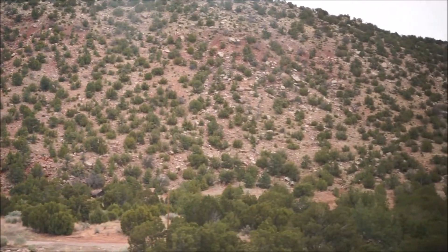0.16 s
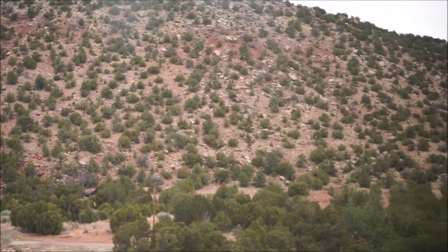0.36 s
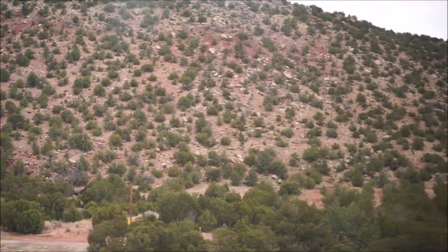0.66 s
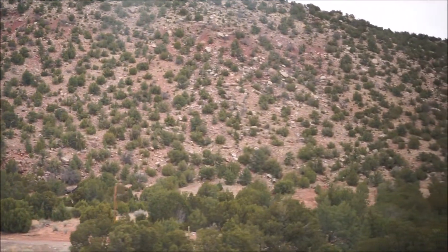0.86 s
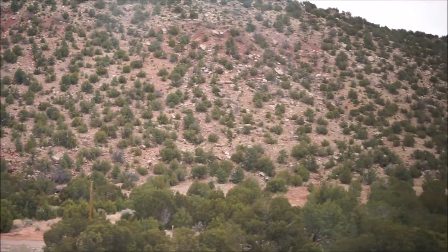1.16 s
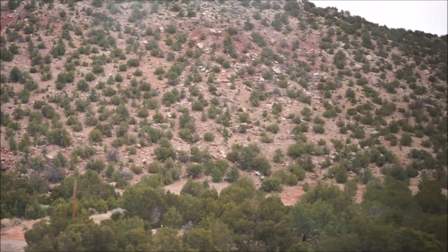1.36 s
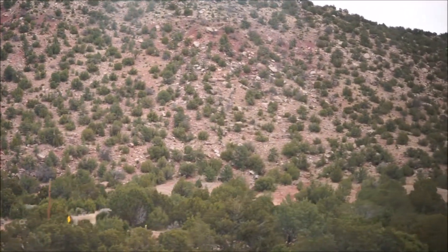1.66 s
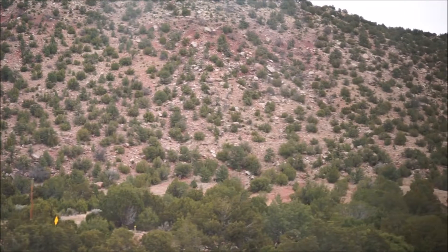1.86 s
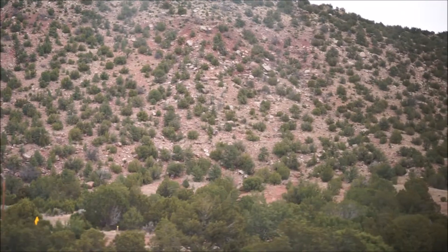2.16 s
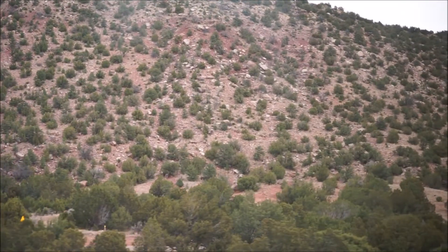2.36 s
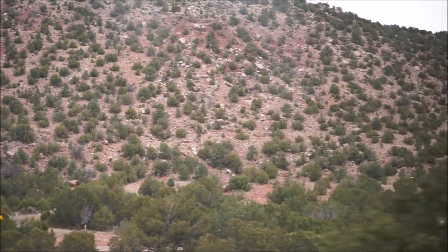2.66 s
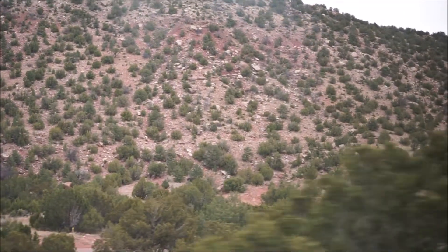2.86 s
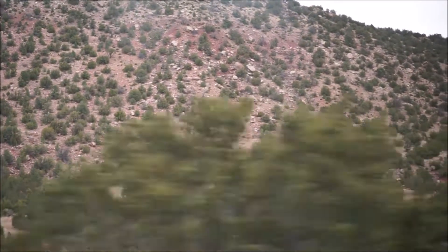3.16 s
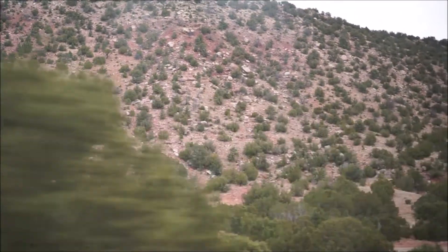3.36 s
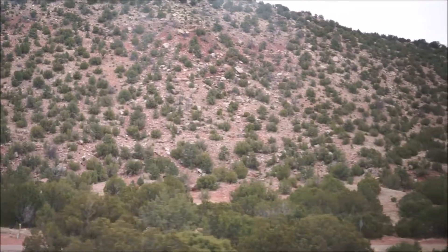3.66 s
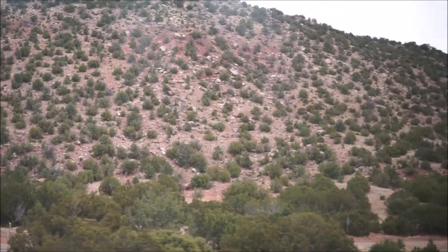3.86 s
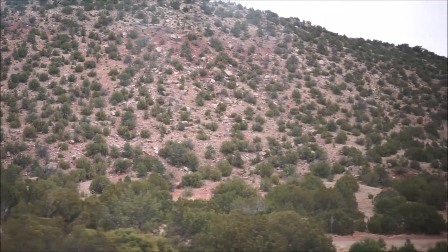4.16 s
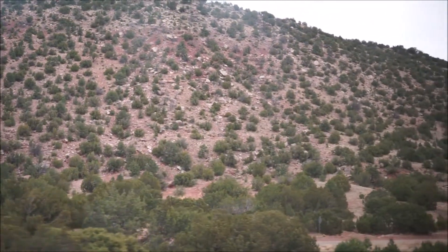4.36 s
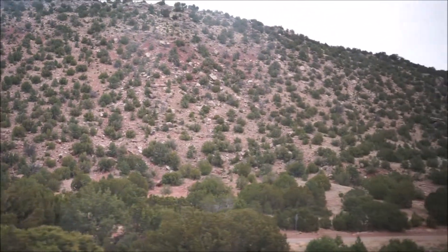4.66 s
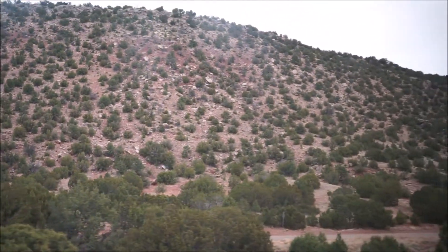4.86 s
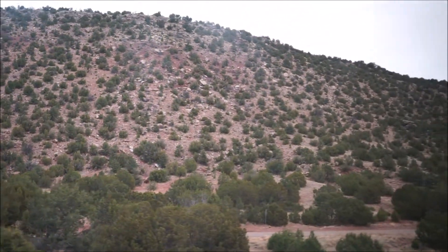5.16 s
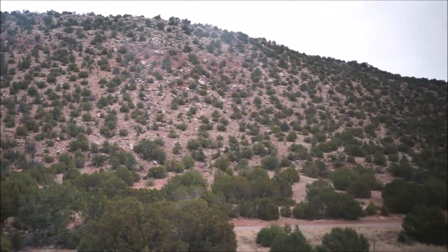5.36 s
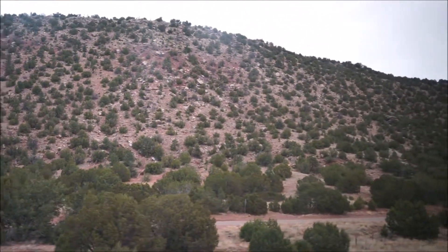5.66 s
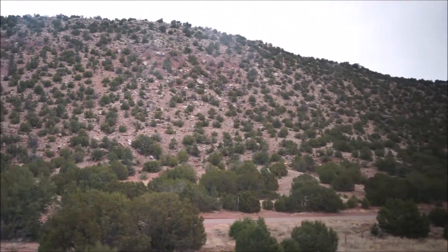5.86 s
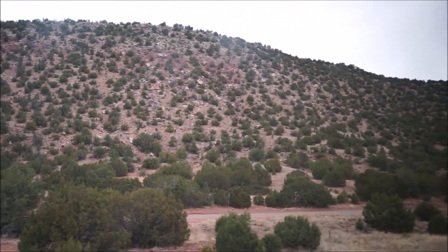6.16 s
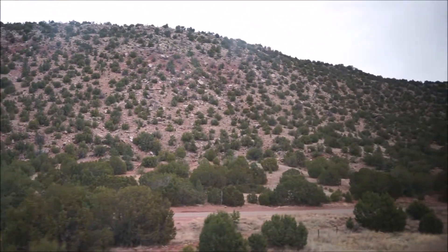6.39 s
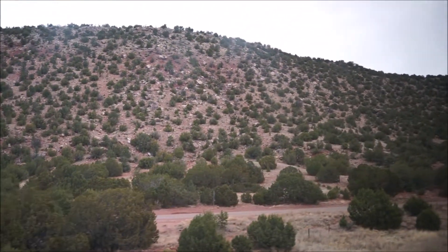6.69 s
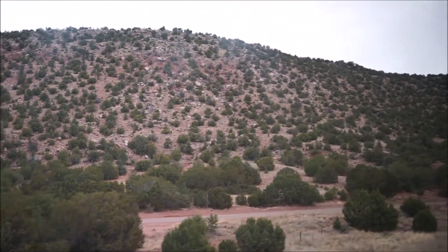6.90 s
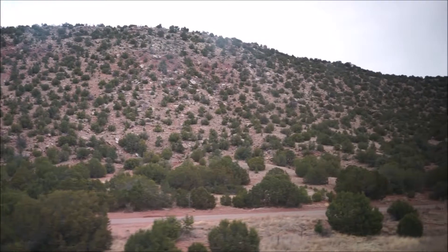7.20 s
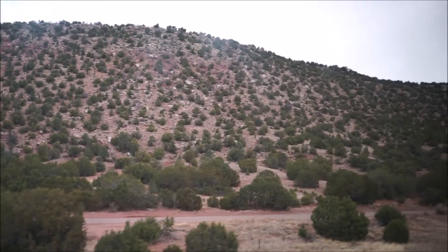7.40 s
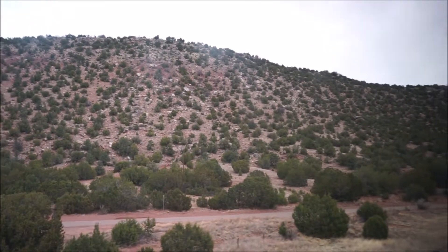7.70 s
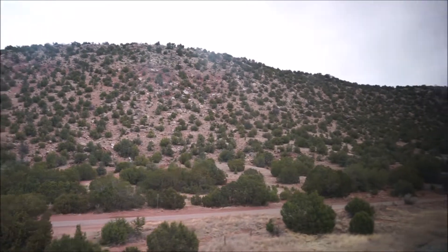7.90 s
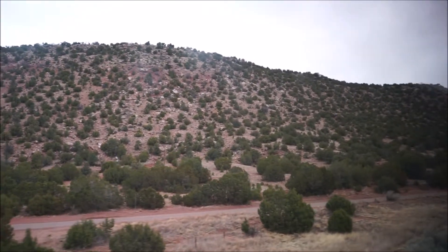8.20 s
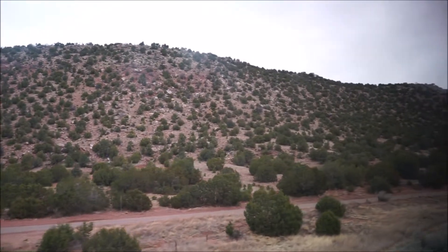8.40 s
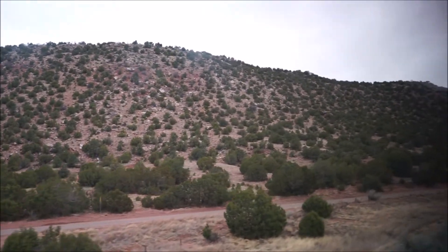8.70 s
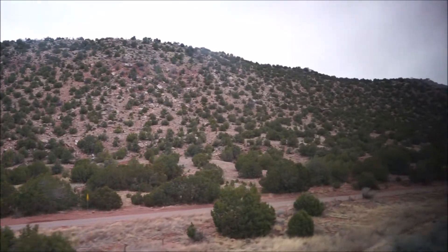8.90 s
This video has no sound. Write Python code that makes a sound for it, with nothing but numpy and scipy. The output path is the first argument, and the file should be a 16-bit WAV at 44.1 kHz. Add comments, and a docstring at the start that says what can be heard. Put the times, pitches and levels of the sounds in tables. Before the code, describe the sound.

A cabin microphone picks up a train rolling past dry hills: broad floor rumble, throbbing body hums and a quiet, steady airy hiss. The loudness keeps creeping upward and stepping quickly down. A small hard tick comes shortly before two close, woody thumps of wheels crossing a joint, with a strong deep bass surge. Afterwards the rumble and hums continue, with one barely noticeable tick late on.

```python
"""Inside a rolling passenger carriage: wheels on rails shake the floor into a broad rumble, shaped noise, while
wavering hums, decaying body modes, come and go and ventilation hisses through the cabin's resonances.
From the first moments rumble, hums and air creep up in level and now and then step quickly down.
Near 2.8 s a fitting ticks, a snap ringing small modes; from 3.3 s a double bump, blows ringing the floor,
passes under the car; near 7.9 s the fitting ticks again, fainter."""
import sys
import numpy as np
from scipy import signal
from scipy.fft import rfft, irfft, next_fast_len
from scipy.io import wavfile
from scipy.ndimage import uniform_filter1d

SR = 44100
rng = np.random.default_rng(int(sys.argv[2]) if len(sys.argv) > 2 else 0)


def file_out(sig):
    """Save sig as 16-bit WAV at sys.argv[1]."""
    # one column per channel
    cols = np.atleast_2d(sig).T
    # limit, then scale
    lim = np.clip(cols, -1, 1)
    pcm = np.round(lim * 32767).astype(np.int16)
    wavfile.write(sys.argv[1], SR, pcm)


N = 398663

# Spectrum of the rolling noise through the floor: frequency_hz, density_db (relative, per Hz)
ROLLING_SPECTRUM = [(14, -8.5), (25, -1), (60, 0), (95, -5), (130, -8), (155, -16), (215, -9), (260, -17.5),
                    (350, -19), (470, -31), (800, -32.5), (900, -39.5), (1600, -45.5), (2500, -59)]
# Spells in which one car-body mode hums; the rails keep most of them going, while the short 166-167 Hz spells
# at 3.33 s and 3.52 s are set ringing by the wheel bumps: # start_s, length_s, pitch_hz, amplitude_db (before
# creep and steps)
HUM_SPELLS = [(.12, .25, 24.7, -11), (.48, .1, 25, -14), (.85, .5, 25, -18), (1.52, .2, 25, -10),
              (1.95, .7, 25.3, -13), (2.7, .55, 31, -15), (3.33, .32, 27.6, -1), (3.7, .25, 27.6, -5),
              (4.62, .75, 28.9, -13), (5.55, .6, 29, -17), (6.5, 1.3, 27.8, -15), (8.05, .3, 30, -13),
              (8.7, .34, 30, -17), (.05, 1.3, 41, -14), (1.55, .75, 56, -13), (2.5, .5, 43, -12.5),
              (3.2, .35, 36.8, -10), (3.65, .5, 36.8, -12), (4.65, 1.0, 41, -19), (5.7, .5, 46, -18),
              (6.4, 1.55, 41.5, -11.5), (8.2, .35, 48, -9), (8.72, .32, 50, -10), (.12, 1.25, 81.5, -15),
              (1.4, .08, 82, -6), (1.4, .5, 73, -15), (1.95, .12, 78, -13), (2.27, .12, 80, -7),
              (2.3, 1.0, 74.8, -10.5), (3.33, .26, 83.5, -8), (3.65, .6, 74.8, -16), (4.3, .85, 75, -21),
              (5.38, .55, 81, -19), (6.1, .08, 84, -14), (6.39, .16, 80, -11), (6.85, .42, 82.3, -12),
              (7.3, .22, 84, -16), (7.55, .55, 82.6, -8), (7.6, .75, 74, -11), (8.35, .69, 83, -13),
              (6.7, .6, 119, -23), (.05, .15, 175.5, -18), (.25, .7, 175.5, -22.5), (.95, 1.5, 169.5, -21),
              (2.5, .6, 169, -26), (3.33, .05, 166, -14), (3.52, .05, 167, -13), (3.65, 2.4, 170, -30),
              (6.55, .9, 167, -28), (7.45, .6, 165, -23), (8.22, .35, 166, -21), (8.8, .24, 166, -20),
              (2.6, 1.4, 205, -24), (0, 1.2, 352, -32)]
# Bumps under the wheels: start_s, level_db (relative), push_ms, rise_ms
WHEEL_BUMPS = [(3.326, -7, 0.66, 16), (3.345, -13, 1.6, 6.5), (3.362, -13, 0.93, 4.8),
               (3.508, -16, 1.3, 11), (3.522, -8, 5.3, 8), (3.545, -9, 5.3, 8)]
# Modes of the floor after a bump: frequency_hz, strength_db, t60_s
FLOOR_MODES = [(118.9, -5, .15), (145, 4, 0.18), (225.9, 2, 0.11), (311, -10.5, .25), (374, -5, 0.066),
               (418, 3.5, 0.042), (486, -1, 0.058), (578, 3, 0.064), (680, -8, 0.062), (820, -6.5, 0.083),
               (930, -10, .05), (1100, -9, 0.08), (1502, -8, 0.054)]
# Ticks of a loose fitting: start_s, level_db (relative), push_ms
FITTING_TICKS = [(2.8075, -21.5, .05), (7.856, -26.5, .08)]
# Modes of the fitting: frequency_hz, strength_db, t60_s
FITTING_MODES = [(1995, 3, 0.0086), (2605.4, -8, 0.0035), (3130, -3, 0.0074), (3798, -3, .003),
                 (4600, -2, 0.0032), (5270, -11, .003), (5900, -2.5, 0.0037), (7100, -13, .002),
                 (7940, -2, .002), (10500, -6, .0015), (13500, -9, .0015)]
# Spectrum of the ventilation air: frequency_hz, density_db (relative, per Hz)
AIR_SPECTRUM = [(600, -6), (1300, -1.5), (1650, -4.5), (2100, -0.5), (3000, -0.5), (3500, -7), (4500, -11),
                (8000, -13), (15500, -15.5)]
# Cabin and duct resonances fed by the air: frequency_hz, width_hz, level_db (above the steady reference)
CABIN_RESONANCES = [(216, 32.6, 15), (354.3, 33, 4.5), (401.3, 15, 1.5), (511.4, 25.7, 7.5),
                    (606.6, 66, 2.5), (657, 33, -1.5), (789, 22, -5), (982.7, 28, -1.5), (1165, 106, -2),
                    (1265, 32, -8.5), (1398, 45, -9), (1634, 25, -14.5), (1835, 60, -10), (2050, 69, -6.5),
                    (2300, 33, -7), (2708, 53, -10), (2896, 140, -5.5), (3098, 48, -9.5), (3940, 180, -13)]
# Quick steps down in level: start_s, drop_db
LEVEL_STEPS = [(.314, 3.6), (.55, .8), (1.1, .6), (1.45, .8), (1.74, 1.3), (2.01, 1.4), (2.3, 1.1),
               (2.428, 3.5), (2.55, .7), (2.72, 1.5), (3.385, 2.8), (3.435, .6), (3.515, 1.5), (3.62, .7),
               (6.14, 4.9), (7.19, 3.1), (7.29, .5), (7.6, .9), (7.805, 2.5), (7.97, 2.6), (8.525, 1.8)]

STEADY_DB = -46.6  # reference of the steady noise at the start: the level of the top hiss
ROLLING_DB, AIR_DB = 32.6, 7.5  # rms above that reference
CREEP_DB_PER_S, STEP_S = 3.8, 0.012  # upward creep; duration of one step down
SWELL_CYCLES, DIE_CYCLES = 3.5, 4.5  # periods a hum takes to build up and to die away
WAVER_SHARE, WANDER_PER_S = 0.012, 17  # pitch spread as a share of the pitch; new random values per second
THROB_DB, THROB_AT_HZ = 4, 120  # strength spread of a mode at this pitch; lower, heavier modes throb less
BUMP_RATTLE_MS, TICK_RATTLE_MS = 14.0, 6.4
TOP_HZ = 15770


def undb(db):
    """Logarithmic level: decibels to amplitude gain."""
    return 10 ** (np.asarray(db) / 20)


def level(x, db):
    """Mean-square normalisation: scale a signal to an rms level."""
    return x * undb(db) / np.sqrt(np.mean(x ** 2))


def walk(rate):
    """Slow random modulation: values held 1 / rate s, smoothed twice; spread near 1."""
    hold = int(SR / rate)
    held = np.repeat(rng.standard_normal(N // hold + 1), hold)
    smooth = uniform_filter1d(uniform_filter1d(held, hold), hold)
    return 1.3 * smooth[:N]


def noise(gain):
    """Linear filtering: white noise weighted by a function of frequency."""
    size = next_fast_len(N)
    hz = np.arange(1, size // 2 + 2) * SR / size
    return irfft(rfft(rng.standard_normal(size)) * gain(hz), size)[:N]


def bands(spectrum, flicker_db, rate):
    """Band decomposition: overlapping octave bands under a spectrum, each flickering on its own."""
    hz, db = np.transpose(spectrum)
    out = 0
    for centre in 2.0 ** np.arange(4, 15):
        def gain(f):
            inside = np.cos(np.pi / 2 * np.clip(np.log2(f / centre), -1, 1))
            return inside * undb(np.interp(np.log(f), np.log(hz), db, left=-90))
        if hz[0] / 2 < centre < 2 * hz[-1]:
            out = out + undb(flicker_db * walk(rate)) * noise(gain)
    return out


def ring(modes, length):
    """Modal superposition: exponentially decaying sines after a unit blow, strengths varied at random."""
    t = np.arange(int(length * SR)) / SR
    luck = undb(2 * rng.standard_normal(len(modes)))
    out = np.zeros(len(t))
    for gain, (hz, db, t60) in zip(luck, modes):
        decay = 1000.0 ** (-t / t60)
        out += gain * undb(db) * np.sin(2 * np.pi * hz * t) * decay
    return out


def blow(push_ms, rattle_ms, loose):
    """Contact excitation: a firm contact, then a fading rattle; a longer push sounds duller."""
    push = np.hanning(int(push_ms * SR / 1000) + 3)
    fade = np.linspace(1, 0, int(rattle_ms * SR / 1000))
    rattle = fade * rng.standard_normal(len(fade))
    force = loose * rattle / np.sqrt(np.sum(rattle ** 2))
    force[0] += 1 - loose  # the firm contact
    return np.convolve(force, push / push.sum())


def add(out, start_s, sound):
    """Superposition: mix a sound in at its start time."""
    i = int(start_s * SR)
    out[i:i + len(sound)] += sound[:len(out) - i]


def rolling():
    """Random excitation: wheels on rails shake the floor into a broad, flickering rumble."""
    return level(bands(ROLLING_SPECTRUM, 1.4, 6), ROLLING_DB)


def hum(length, hz, waver, throb):
    """Sustained resonance: a body mode, kept ringing by the rails or set off by a bump, swells, wavers, throbs
    and dies away."""
    t = np.arange(len(waver)) / SR
    swell = np.minimum(t * hz / SWELL_CYCLES, 1)
    dying = np.clip(1 - (t - length) * hz / DIE_CYCLES, 0, 1)
    cycles = np.cumsum(hz * (1 + WAVER_SHARE * waver)) / SR + rng.random()
    strength = level(undb(THROB_DB * np.sqrt(hz / THROB_AT_HZ) * throb), 0)
    return swell * dying * strength * np.sin(2 * np.pi * cycles)


def hums():
    """Modal superposition: every spell of humming, wandering along its own stretch of random modulation."""
    out = np.zeros(N)
    wander = np.array([walk(WANDER_PER_S), walk(WANDER_PER_S)])
    for start_s, length, hz, db in HUM_SPELLS:
        size = int((length + DIE_CYCLES / hz) * SR)
        at = int(rng.random() * (N - size))
        waver, throb = wander[:, at:at + size]
        add(out, max(start_s, 0), undb(db) * hum(length, hz, waver, throb))
    return out


def bumps():
    """Impact response: wheel blows ring the floor, building up on the way through springs and frame."""
    out = np.zeros(N)
    for start_s, db, push_ms, rise_ms in WHEEL_BUMPS:
        sound = signal.fftconvolve(ring(FLOOR_MODES, 0.5), blow(push_ms, BUMP_RATTLE_MS, 0.3))
        rise = np.minimum(np.arange(len(sound)) / (rise_ms * SR / 1000), 1)
        add(out, start_s, undb(db) * sound * rise)
    return out


def ticks():
    """Impact response and radiation: short hard snaps of a part too small to radiate bass."""
    out = np.zeros(N)
    for start_s, db, push_ms in FITTING_TICKS:
        sound = signal.fftconvolve(ring(FITTING_MODES, 0.05), blow(push_ms, TICK_RATTLE_MS, 0.76))
        add(out, start_s, undb(db) * sound)
    return signal.sosfilt(signal.butter(4, 1750, "high", fs=SR, output="sos"), out)


def ventilation():
    """Resonant filtering: air hiss plus the cabin and duct resonances that it feeds."""
    out = level(bands(AIR_SPECTRUM, 0.17, 14), AIR_DB)
    for hz, width, db in CABIN_RESONANCES:
        peak = noise(lambda f: 1 / (1 + (2 * (f - hz) / width) ** 2))
        out = out + undb(1.92 * walk(4)) * level(peak, db)
    # rail roughness makes hiss and resonances flutter together a little
    return out * undb(0.24 * walk(45))


def drift_db():
    """Level modulation: a steady creep upwards, cut by quick steps down."""
    t = np.arange(N) / SR
    drift = CREEP_DB_PER_S * t
    for start_s, drop_db in LEVEL_STEPS:
        drift -= drop_db * np.clip((t - start_s) / STEP_S, 0, 1)
    return drift


def scene():
    """Superposition at one microphone: drifting rumble, air and hums, with bumps and ticks unaffected."""
    steady = undb(STEADY_DB) * (rolling() + ventilation())
    drifting = undb(drift_db()) * (steady + hums())
    return (drifting + bumps() + ticks())[None]


def record(dry):
    """Saturation and band limiting: the loudest peaks flatten at full scale, then the top is cut."""
    knee = 12.0  # a high exponent bends only the peaks
    soft = dry / (1 + np.abs(dry) ** knee) ** (1 / knee)
    return signal.sosfilt(signal.ellip(16, 0.2, 70, TOP_HZ, fs=SR, output="sos"), soft)


dry = scene()
out = record(dry)
file_out(out)
```